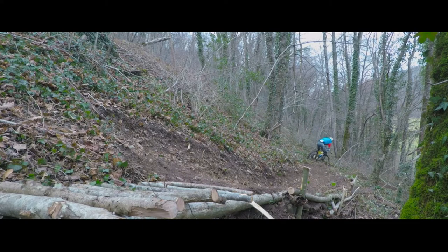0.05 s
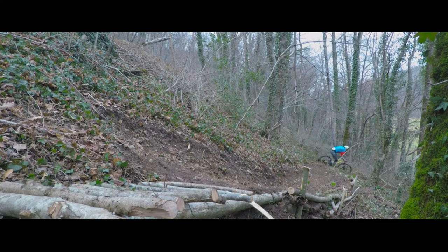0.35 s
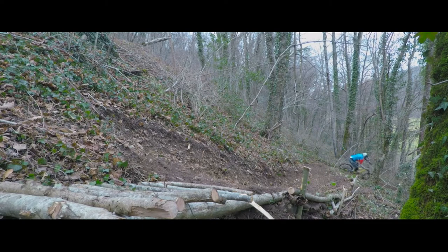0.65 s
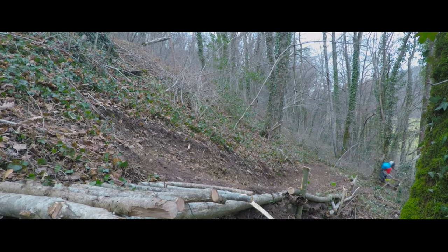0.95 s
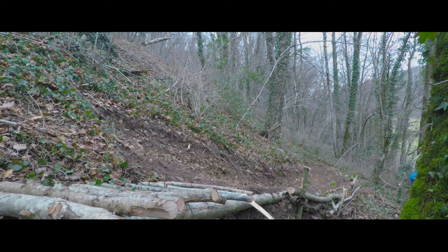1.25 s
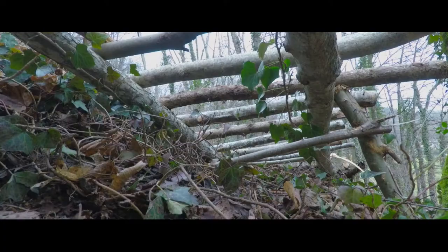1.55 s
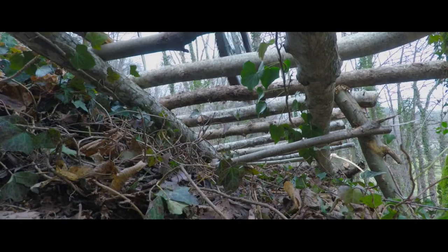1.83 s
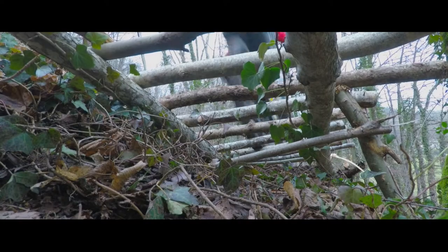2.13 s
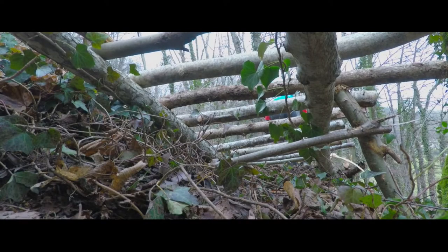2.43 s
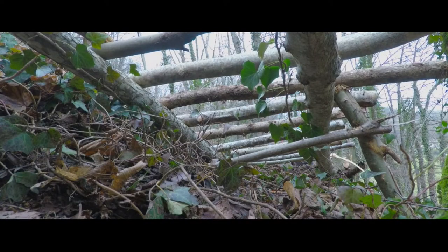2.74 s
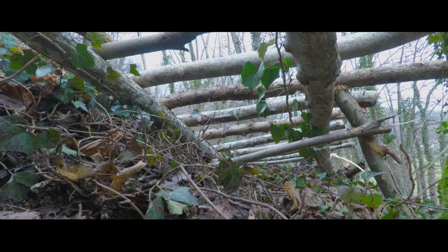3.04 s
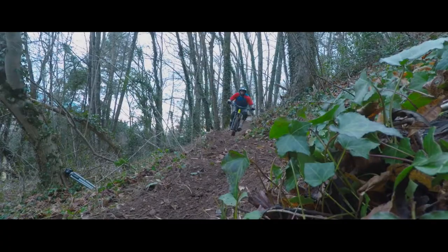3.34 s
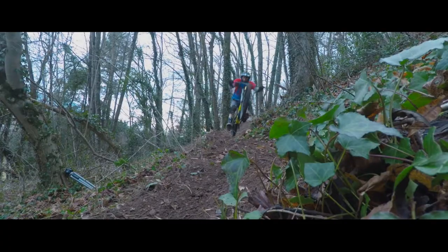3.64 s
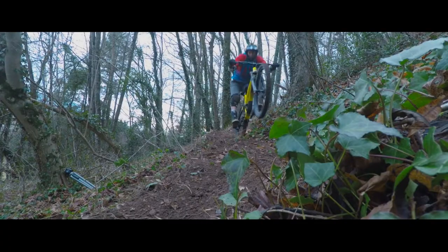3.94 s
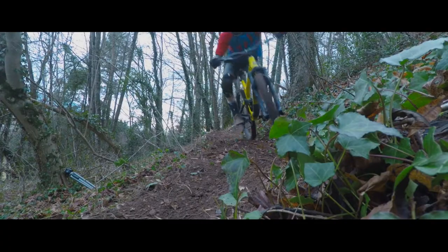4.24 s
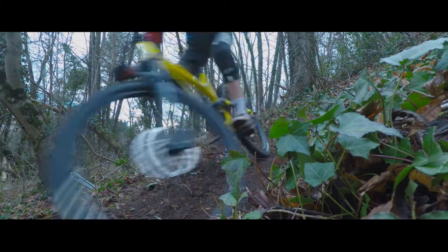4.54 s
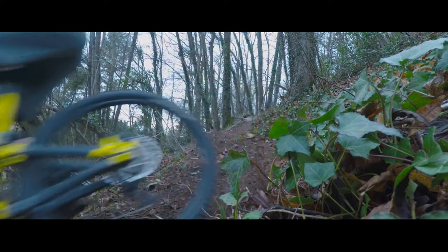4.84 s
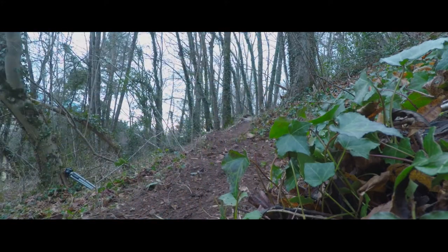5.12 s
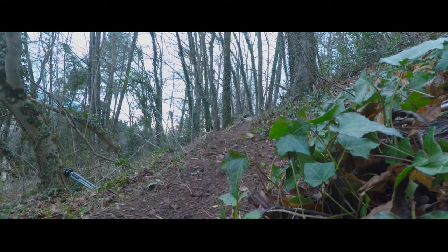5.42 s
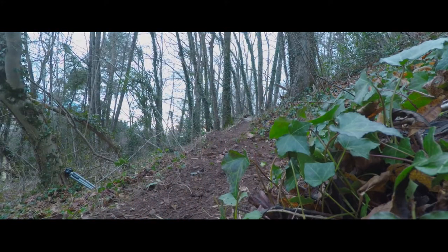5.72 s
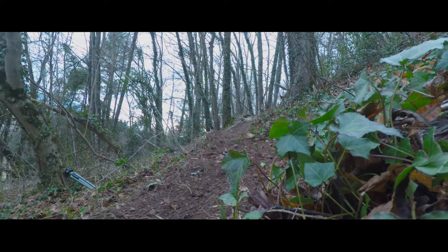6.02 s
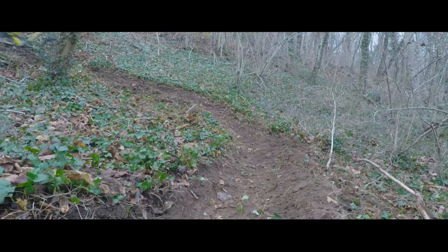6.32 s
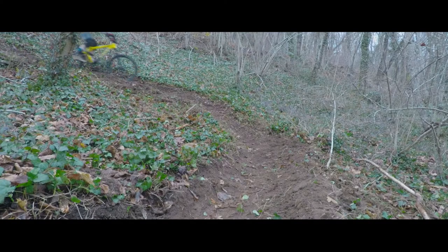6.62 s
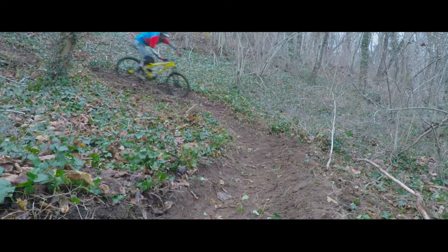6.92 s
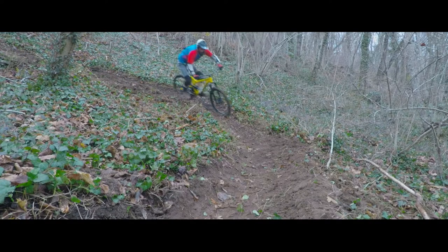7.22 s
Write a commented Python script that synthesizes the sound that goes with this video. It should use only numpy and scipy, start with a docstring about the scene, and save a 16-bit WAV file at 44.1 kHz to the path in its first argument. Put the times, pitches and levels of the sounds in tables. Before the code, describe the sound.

Mountain bikes pass four times on a forest dirt trail, heard from a microphone near the ground. The first crunches faintly over leaves and a stick snaps. The second knocks and rumbles over a log bridge just overhead, chain clicking. The third jumps past very close, thumping, knocking stones and coasting off with a ticking freewheel. The last approaches over crackling leaves. Gusts of air buffet the microphone.

```python
"""Mountain bikes on a forest dirt trail, from a small camera lying near the ground.
The first passes 5 m off, knobbly tyres booming and crunching over grit and dry leaves; a stick snaps.
The second sets a log bridge knocking and rumbling just overhead, its chain clicking. The third jumps
past at 1 m, thumps on roots, knocks stones and coasts away, freewheel ticking. The last comes down
to 2.5 m. Throughout, moving air buffets the microphone and the trees scatter a thin echo."""
import sys
import numpy as np
from scipy import signal
from scipy.fft import rfft, irfft
from scipy.io import wavfile
from scipy.ndimage import uniform_filter1d, map_coordinates

SR = 44100
rng = np.random.default_rng(int(sys.argv[2]) if len(sys.argv) > 2 else 0)


def generate_wav(signal):
    """Clip the signal to [-1, 1] and save it as 16-bit WAV at the path in sys.argv[1]."""
    frames = np.transpose(np.atleast_2d(signal))
    scaled = np.clip(frames, -1, 1) * 32767
    pcm = np.round(scaled).astype(np.int16)
    wavfile.write(sys.argv[1], SR, pcm)


N = 325017
T = np.arange(N) / SR
HIT_T = T[:8192]  # time within one blow

# one bike rides past between each two edges: edge_s
PASS_EDGES_S = [0, 1.51, 3.15, 6.18, 7.4]
# spectrum of grit ground under a tyre: frequency_hz, level_db
GRIT_SPECTRUM = [(60, -26), (150, -19), (350, 2.5), (520, 1), (750, 1), (1200, -5), (2000, -11),
                 (3000, -14.5), (6000, -19.5), (15000, -81)]
# spectrum of a dry click: frequency_hz, level_db
CLICK_SPECTRUM = [(60, -43), (200, 7), (800, 7.5), (4000, 1.5), (4900, -2.5), (6300, 1), (7200, -1.5),
                  (8400, -15.5), (15000, -23.5)]


def ride():
    """Each bike runs by in a straight line; its place sets tyre levels, side and scattered share."""
    # a row a bike; levels at its nearest to the microphone, pans positive to the left:
    # nearest_s, nearest_m, boom_db, grit_db, leaf_db, coming_pan_db, going_pan_db
    passes = [(0.28, 5, -51.5, -57, -57, -8, -2.5), (2.078, 0.79, -31, -41, -39.5, 10.5, 2.5),
              (4.758, 1, -26.5, -25, -38.5, 1, 9), (7.35, 2.47, -35.5, -36.5, -45, 5, 3)]
    speed_m_s, half_scattered_m = 5.49, 5.2
    current = np.searchsorted(PASS_EDGES_S, T, side="right") - 1
    nearest_s, nearest_m, boom_db, grit_db, leaf_db, coming_db, going_db = np.array(passes)[current].T
    along_m = speed_m_s * (T - nearest_s)
    distance_m = np.hypot(along_m, nearest_m)
    doublings = np.log2(distance_m / nearest_m)
    # with distance the soft ground soaks up the crunch of grit most
    levels = boom_db - 6 * doublings, grit_db - 11 * doublings, leaf_db - 6.5 * doublings
    pan_db = coming_db + (going_db - coming_db) * (1 + along_m / distance_m) / 2
    return levels, pan_db, distance_m / (distance_m + half_scattered_m)


def tyres(levels, pan_db, share):
    """Knobs drum the casing, grind grit and crush leaves; uneven ground jolts all three together."""
    # a tyre scuffs sideways: middle_s, half_length_s, more_grit_db, more_leaf_db
    scuffs = [(0.3, 0.081, 14, 4.5), (1.711, 0.055, 9, 13.5), (3.52, 0.2, 6.5, 5.5), (4.164, 0.064, -4, 9),
              (4.653, 0.029, 2, 1), (4.85, 0.09, -2.5, 3), (6.285, 0.047, 4, 9.5), (6.4, 0.084, -10, 5.5),
              (6.534, 0.035, 11, 4.5), (6.988, 0.024, 5, 3)]
    # the bike goes light or leaves the ground: middle_s, half_length_s, drop_db
    hops = [(1.662, 0.016, 7), (3.814, 0.09, 10), (4.065, 0.048, 4), (4.948, 0.017, 10), (5.849, 0.37, 0.5),
            (6.623, 0.33, 8.5)]
    # spectra of the casing, dry leaves and crumbs of dirt landing on them: frequency_hz, level_db
    casing_spectrum = [(60, -38), (100, -50.5), (130, -12.5), (160, 2.5), (190, 0.5), (250, -7),
                       (320, -11.5), (450, -16), (700, -25), (1500, -82.5)]
    leaf_spectrum = [(700, 2.5), (1800, -2), (2900, 2), (3900, 1.5), (4900, -4.5), (6200, -1), (7100, -1.5),
                     (8300, -12.5), (10000, -15), (12000, -36), (15000, -54)]
    spray_spectrum = [(1500, -2.5), (3500, 1), (6300, 15.5), (8300, -28), (11500, -8.5), (14500, -10),
                      (16000, -35)]
    boom_db, grit_db, leaf_db = levels
    for s, half_length_s, more_grit_db, more_leaf_db in scuffs:
        slip = np.exp(-((T - s) / half_length_s) ** 2)
        grit_db, leaf_db = grit_db + more_grit_db * slip, leaf_db + more_leaf_db * slip
    lift_db = sum(db * np.exp(-((T - s) / half_length_s) ** 2) for s, half_length_s, db in hops)
    boom_db, grit_db = boom_db - lift_db, grit_db - lift_db / 2
    jolt = np.tanh(walk(70)) * (1.3 - share)  # the suspension limits the jolts, distance smooths them
    boom = contact(casing_spectrum, boom_db + 1.5 + 3 * jolt,
                   rate=1200, spread_db=3, pan_db=0.14 * pan_db, share=0.27 * share ** 2)
    grit = contact(GRIT_SPECTRUM, grit_db - 6 + 4 * jolt,
                   rate=1500, spread_db=1.5, pan_db=pan_db, share=share ** 0.99)
    leaves = contact(leaf_spectrum, leaf_db + 0.5 + 2 * jolt + 2 * walk(200),
                     rate=6000, spread_db=2.5, pan_db=0.47 * pan_db, share=share ** 0.78)
    # flung crumbs tick brightly, and carry only from close to the microphone
    spray = contact(spray_spectrum, leaf_db - 4.5 - 6.5 * share + 4 * walk(120),
                    rate=290, spread_db=0, pan_db=0.11 * pan_db, share=0.9)
    return no_bass(boom + grit + leaves + spray, hz=114)


def thumps(small_bumps, pan_db, share):
    """The casing booms for a few cycles as the tyre squashes; earth thuds and grit is crushed."""
    # a tyre hits a root or log, or lands: start_s, boom_db, squash_s, earth_db, grit_db
    blows = [(0.186, -41, 0.0082, -41, -39), (0.272, -42, 0.017, -38, -42.5), (0.31, -34, 0.0064, -43, -48),
             (1.515, -21.5, 0.0044, -39, -44), (1.56, -20, 0.013, -29.5, -40), (1.692, -11, 0.01, -20, -32),
             (1.72, -8.5, 0.0062, -22, -56), (1.82, -1, 0.0073, -16, -22), (1.892, -12, 0.0046, -51, -55),
             (1.935, -10.5, 0.013, -44, -34), (1.974, -12, 0.011, -13, -23), (2.034, -11, 0.0077, -34, -44),
             (2.068, -1.5, 0.0038, -41, -45), (2.095, -3.5, 0.0072, -40, -50),
             (2.115, -11, 0.0076, -46, -51), (2.19, -10, 0.0062, -22.5, -34), (2.214, -12, 0.013, -29, -42),
             (2.239, -19, 0.009, -50, -51), (3.113, -23.5, 0.0078, -30.5, -47),
             (3.415, -27.5, 0.049, -32, -45), (3.952, -24.5, 0.013, -29.5, -62),
             (3.985, -23, 0.012, -29.5, -34.5), (4.117, -18.5, 0.0059, -22, -22.5),
             (4.165, -20, 0.0052, -24.5, -52), (4.32, -31, 0.0058, -49, -28),
             (4.365, -15.5, 0.012, -24, -28), (4.427, -10, 0.013, -28, -22),
             (4.521, -17.5, 0.017, -23, -24), (4.545, -13, 0.017, -17, -20.5),
             (4.571, -27, 0.011, -21, -22), (4.639, -16, 0.009, -20, -19.5), (4.66, -14, 0.016, -21, -27),
             (4.725, -22, 0.0033, -16, -33), (4.775, -22, 0.012, -15.5, -29),
             (4.805, -34, 0.0074, -18.5, -28), (4.954, -21, 0.0081, -10.5, -18),
             (4.965, -2, 0.0079, -12, -22), (5.045, -20, 0.03, -16.5, -24), (5.102, -2, 0.0028, -14, -44),
             (5.136, -18, 0.0033, -20, -34), (5.223, -14.5, 0.0053, -26, -41),
             (5.269, -14.5, 0.0022, -29.5, -40), (5.349, -21.5, 0.0076, -30.5, -53),
             (5.403, -17.5, 0.0096, -33, -55), (5.499, -37, 0.0087, -33, -42),
             (5.589, -21.5, 0.0023, -38, -55), (5.654, -27, 0.0041, -33, -39.5),
             (5.814, -37, 0.0034, -30, -62), (6.059, -29.5, 0.016, -33.5, -47),
             (6.27, -20, 0.0073, -51, -51), (6.511, -25, 0.01, -41.5, -49), (6.953, -31.5, 0.02, -44, -46),
             (7.11, -22.5, 0.011, -38.5, -29.5), (7.228, -16.5, 0.0069, -37, -42),
             (7.303, -18.5, 0.0098, -27, -35), (7.355, -14, 0.0056, -21.5, -26.5)]
    # spectrum of packed earth: frequency_hz, level_db
    earth_spectrum = [(100, -32.5), (200, -1), (310, 6), (450, -2), (580, -6.5), (900, -28), (2500, -53)]
    casing_hz = 186.7
    booms, crunch = np.zeros(N), np.zeros((3, N))  # crunch: one direct path, two scattered
    for s, boom_db, squash_s, earth_db, grit_db in list(blows) + small_bumps:
        hz = casing_hz * (1 + 0.062 * rng.standard_normal())
        squash = HIT_T / squash_s
        load = (squash * np.exp(1 - squash)) ** 1.8
        sag = 1 + 0.13 * np.exp(-squash)  # the pitch sinks as the load comes off
        add(booms, s, peak(load * np.sin(2 * np.pi * np.cumsum(hz * sag) / SR), boom_db - 4.5))
        crush = [grains(3500, 3.84, len(HIT_T)) * squash ** 0.31 * np.exp(-squash) for _ in crunch]
        add(booms, s, peak(colour(crush[0], earth_spectrum), earth_db + 2))
        add(crunch, s, np.array([peak(colour(path, GRIT_SPECTRUM), grit_db + 6.5) for path in crush]))
    grit = place(crunch[0], crunch[1:], pan_db, 0.92 * share)
    return no_bass(booms, hz=119) * pan(0.26 * pan_db) + no_bass(grit, hz=135)


def bumps(boom_db, grit_db, count):
    """Small stones and roots at random places give blows for thumps(), as strong as the rolling."""
    squash_s, spread_db = 0.011, 7
    when, size = rng.random((count, 2)).T
    times = (np.arange(count) + when) * T[-1] / count
    size_db = 2 + spread_db * (2 * size - 1)
    thump_db = np.interp(times, T, boom_db) + size_db
    crush_db = np.interp(times, T, grit_db) + size_db
    return [(s, db, squash_s, db - 5, crush) for s, db, crush in zip(times, thump_db, crush_db)]


def logs():
    """Loose bridge logs knock, each with its own pitch and damping; full weight gives a dull knock."""
    # knocks under the wheels: start_s, level_db, tilt_db_per_octave, pitch_hz, t60_s
    knocks = [(1.695, -23, -20, 456, 0.054), (1.722, -29, -22, 480, .04), (1.822, -18.5, -2.5, 520, 0.023),
              (1.943, -22.5, 0, 587, .03), (1.978, -15.5, -7.5, 661, 0.052), (2.038, -20.5, 5, 657, 0.028),
              (2.065, -21, 8, 638, 0.032), (2.104, -22.5, -5, 650, .05), (2.156, -27, -3, 710, .035),
              (2.176, -23.5, 0, 642, 0.044), (2.212, -23, 0.5, 638, .045), (2.307, -29, -2, 716, 0.016),
              (2.354, -25.5, -4.5, 607, 0.027), (2.645, -27, -15.5, 491, 0.026),
              (2.775, -37, -10, 672, .07), (2.912, -27.5, -13.5, 590, 0.02), (2.932, -36, -9.5, 690, .025),
              (3.013, -31, -15, 602, 0.05), (3.03, -34.5, -13, 647, 0.08), (3.098, -30.5, -14, 596, 0.035),
              (3.107, -32, -7.5, 718, .025), (3.117, -27.5, -13, 565, 0.032)]
    # modes of a log: pitch_ratio, level_db, t60_ratio
    modes = [(.69, -3, 0.48), (1, 4.5, 1.13), (1.25, 1, .45), (1.46, -6, 1.1), (2.19, 2.5, 1.2),
             (2.42, 2, 1.03), (2.83, -10, .5), (3.39, 2, 1.3), (3.87, -4, 0.54), (5.17, -1, 1)]
    out = np.zeros(N)
    for s, db, tilt_db, hz, t60 in knocks:
        ring = np.zeros(len(HIT_T))
        for ratio, mode_db, t60_ratio in modes:
            # each log is struck at its own spot, so its modes vary in strength
            gain = undb(mode_db + tilt_db * np.log2(ratio) + 3 * rng.standard_normal())
            mode_hz = hz * ratio * (1 + 0.019 * rng.standard_normal())
            ring += gain * fade(t60 * t60_ratio) * np.sin(2 * np.pi * (mode_hz * HIT_T + rng.random()))
        crack = clack(hz=795, t60=0.061, q=0.57, splinter=0.49)
        add(out, s, peak(ring * swell(0.0007), db) + peak(crack, db - 6.5 + tilt_db / 2))
    return out


def deck():
    """Tyre knobs drum on the logs and keep the hollow bridge ringing above the microphone."""
    # the rumble while the wheels are on the bridge: time_s, level_db
    rumble = [(1.68, -42), (1.77, -32), (1.87, -28), (2.0, -27.5), (2.12, -22), (2.23, -23), (2.3, -32.5),
              (2.42, -48)]
    # resonances of the bridge: pitch_hz, q, level_db
    modes = [(193, 7.2, 0), (146, 5.3, -6.5), (368, 5.9, -22.5), (665, 5.5, -30)]
    drumming = grains(1500, 1.3)
    ring = sum(undb(db) * unit(resonate(resonate(drumming, hz, q), hz, q)) for hz, q, db in modes)
    return unit(ring) * undb(level_curve(rumble))


def stones(grit_db, pebble_count):
    """Stones and pebbles scrape briefly and ring; the pebbles follow the level of the rolling crunch."""
    # stones knock together under a tyre: start_s, peak_db, pitch_hz
    knocks = [(0.286, -34, 714), (4.282, -29, 740), (4.318, -27, 890), (4.368, -31, 1030),
              (4.47, -26.5, 620), (4.557, -19, 470), (4.608, -17.5, 830), (4.644, -12, 786),
              (4.661, -14, 750), (4.673, -18, 898), (4.731, -20, 1030), (4.779, -19.5, 770),
              (4.792, -23, 1110), (4.812, -23, 675), (4.966, -27, 720), (5.067, -31, 1010),
              (5.08, -17, 814)]
    # modes of a stone bedded in earth: pitch_ratio, level_db, t60_s
    modes = [(1, 7, 0.025), (1.45, -1, 0.026), (2.2, -12, 0.018)]
    when, size, pitch = rng.random((pebble_count, 3)).T
    pebble_s = when * T[-1]
    pebble_db = np.interp(pebble_s, T, grit_db) - 3.5 + 7.5 * (2 * size - 1)
    pebble_hz = 1000 * 2 ** (0.91 * (2 * pitch - 1))
    decays = [(ratio, undb(db) * fade(t60)) for ratio, db, t60 in modes]
    out = np.zeros(N)
    for s, db, hz in list(knocks) + list(zip(pebble_s, pebble_db, pebble_hz)):
        ring = sum(decay * np.sin(2 * np.pi * ratio * hz * HIT_T) for ratio, decay in decays)
        add(out, s, peak(signal.fftconvolve(burst(t60=0.0085), ring), db))
    return out


def stone_strikes():
    """The tyre bottoms on a hard stone and gives one blunt shove."""
    # single pulses: start_s, peak_db, contact_s
    strikes = [(4.538, -13.5, 0.00028), (4.558, -14, 0.00059), (4.661, -17, 0.00033), (4.732, -14, .0003),
               (4.78, -16, 0.00039), (4.966, -7.5, .0003), (4.972, -7, 0.00019), (5.05, -14.5, 0.00043),
               (5.103, -9.5, 0.00063)]
    out = np.zeros(N)
    for s, db, contact_s in strikes:
        age = HIT_T / contact_s
        add(out, s, -peak(no_bass(age ** 2 * np.exp(-2 * age), hz=240), db))
    return out


def crunches():
    """Dry stalks and grit give way: crackles start at once, last while the tyre presses and stop."""
    # bursts of crackles: start_s, peak_db, length_s, centre_hz
    bursts = [(4.642, -18.5, .016, 1510), (4.672, -22, .006, 1200), (4.705, -23, .006, 1300),
              (4.729, -21.5, 0.0097, 1200), (5.063, -20.5, .016, 1300), (6.319, -32.5, 0.011, 3820),
              (6.507, -42, .012, 3020), (6.527, -39, 0.013, 3200), (6.847, -31, .016, 2200),
              (6.894, -28.5, 0.015, 4000), (7.01, -29, 0.013, 2400), (7.097, -24.5, 0.026, 2670),
              (7.15, -29.5, 0.018, 3200)]
    out = np.zeros(N)
    for s, db, length_s, hz in bursts:
        press = np.exp(-(HIT_T / length_s) ** 4)
        crackles = grains(rate=3000, spread_db=3, size=len(HIT_T)) + signal.unit_impulse(len(HIT_T))
        add(out, s, peak(colour(resonate(crackles * press, hz, q=1.2), CLICK_SPECTRUM), db))
    return out


def clack(hz, t60, q, splinter):
    """A crack builds up within a millisecond and splinters, ringing briefly round one pitch."""
    age_ms = HIT_T / 0.001
    force = age_ms * np.exp(1 - age_ms) + 2 * splinter * (1 - np.exp(-age_ms / 2)) * fade(t60)
    return colour(resonate(force * rng.standard_normal(len(HIT_T)), hz, q), CLICK_SPECTRUM)


def rattles():
    """Twigs, stones and chain clack sharply."""
    # single clacks: start_s, level_db, centre_hz, t60_s
    clacks = [(1.526, -15, 5230, 0.037), (1.819, -22.5, 1120, 0.067), (2.066, -16.5, 1930, 0.061),
              (2.104, -21, 2190, 0.023), (2.39, -24, 2800, 0.017), (2.544, -25.5, 5460, 0.017),
              (2.728, -27, 6600, 0.042), (3.557, -27, 5290, 0.0091), (4.118, -35, 1190, 0.039),
              (4.124, -24, 5160, 0.048), (4.537, -16, 926, 0.025), (4.587, -22.5, 2480, 0.014),
              (4.804, -20, 5860, 0.016), (4.849, -27, 4200, 0.029), (4.872, -18.5, 4000, 0.028),
              (4.92, -24, 4940, 0.03), (5.037, -19, 882, 0.023), (5.202, -35, 5000, 0.033),
              (5.264, -33, 7150, 0.05), (5.479, -31.5, 1880, 0.069), (5.494, -36, 5530, 0.015),
              (6.893, -29, 1150, 0.055), (6.997, -29.5, 3200, 0.025), (7.233, -22.5, 5100, 0.052),
              (7.333, -23, 2320, 0.044), (7.358, -22, 1200, 0.033)]
    out = np.zeros(N)
    for s, db, hz, t60 in clacks:
        add(out, s, peak(clack(hz, t60, q=2.2, splinter=0.3), db + 0.5))
    return out


def freewheel():
    """While the rider coasts, each pawl ticks and leaves a steel sizzle."""
    # spells of coasting: start_s, end_s, ticks_per_s, tick_db, sizzle_db
    coasting = [(1.518, 1.53, 26.3, -27, -33), (1.607, 1.73, 26.2, -33, -39.5),
                (1.761, 1.93, 27, -24.5, -35), (2.026, 2.26, 26, -38, -46), (3.782, 4.097, 41, -40.5, -55),
                (4.697, 4.94, 48.5, -30, -38), (5.205, 6.15, 45, -46, -50)]
    # spectrum of the sizzle: frequency_hz, level_db
    sizzle_spectrum = [(4000, -13), (6500, 0), (11500, -18), (14500, -13), (16000, -36)]
    out = np.zeros(N)
    for start, end, rate, tick_db, sizzle_db in coasting:
        for s in np.arange(start, end, 1 / rate):
            pawl = clack(hz=3100, t60=0.05, q=2.9, splinter=0.45)
            pawl += clack(hz=6300, t60=0.035, q=1.3, splinter=0.8)
            add(out, s, peak(pawl, tick_db + rng.standard_normal()))
            add(out, s, peak(colour(burst(t60=0.079), sizzle_spectrum), sizzle_db))
    return out


def chain():
    """Chain links and cables flick against the frame: bright ticks of steel that die at once."""
    # single flicks: start_s, peak_db
    flicks = [(1.645, -35), (1.801, -24), (1.838, -29), (1.846, -24), (1.9572, -26), (1.99, -26),
              (2.0284, -31), (2.076, -23), (2.112, -28), (2.1466, -33), (2.2094, -28), (2.2485, -30),
              (2.391, -26), (2.4644, -30.5), (2.5116, -28), (2.737, -38), (5.038, -28.5)]
    # ring of a chain link: frequency_hz, level_db
    link_spectrum = [(1500, -13), (3200, 2.5), (4800, -4.5), (6400, 4), (7600, -3.5), (8600, -12),
                     (11500, -17), (15000, -20)]
    out = np.zeros(N)
    for s, db in flicks:
        add(out, s, peak(colour(burst(t60=0.026), link_spectrum), db))
    return out


def brake_disc():
    """A brake disc pings once, on a single mode."""
    start_s, pitch_hz = 4.462, 2780
    out = np.zeros(N)
    ring = np.sin(2 * np.pi * pitch_hz * HIT_T) * swell(0.002) * fade(t60=0.052)
    add(out, start_s, peak(ring, db=-27.5))
    return out


def stick():
    """A dry stick far down the trail breaks in two quick steps and rings briefly."""
    # steps of the break: start_s, peak_db
    snaps = [(0.5176, -19), (0.521, -29)]
    # modes of the stick: pitch_hz, level_db, t60_s
    modes = [(1900, -3, .014), (2270, 0, .012), (2650, 0, .008), (3200, 0, .005), (5700, -7, .005)]
    out = np.zeros(N)
    ring = sum(undb(db) * fade(t60) * np.sin(2 * np.pi * hz * HIT_T) for hz, db, t60 in modes)
    for s, db in snaps:
        add(out, s, peak(ring * swell(0.00045), db))
    return out


def whirr(pan_db, share):
    """Far down the trail the ticks of the freewheel smear into a whirr at the pitch of the hub."""
    # the whirr as the bike rolls away: time_s, level_db
    receding = [(5.1, -48), (5.5, -53), (6.15, -59)]
    # ring of the rear hub: frequency_hz, level_db
    hub_spectrum = [(1500, -15), (2400, -5), (2800, 0.5), (3200, -19), (3800, -27), (4300, -5.5),
                    (5000, -32), (5900, -48), (7000, -3.5), (9000, -29)]
    return contact(hub_spectrum, level_curve(receding), rate=740, spread_db=3, pan_db=pan_db, share=share)


def trees(x, t60, db):
    """Trunks and the bank throw back a thin echo, different at each microphone port."""
    # frequency_hz, level_db
    echo_spectrum = [(150, -9.5), (700, 0.5), (2500, 2.0), (6500, -2.0), (12000, 9.5)]
    decay = np.exp(-np.log(1000) * T[:SR // 2] / t60)
    tails = [colour(grains(4000, 2, len(decay)) * decay, echo_spectrum) for _ in range(2)]
    return np.array([signal.oaconvolve(x, tail / np.linalg.norm(tail))[:N] for tail in tails]) * undb(db)


def wind():
    """Eddies, strongest in the wake of a bike, buffet the two microphone ports."""
    # gusts swell, then die away until the pass ends: start_s, rise_s, level_db, fall_db_per_s
    gusts = [(0, 0.29, -38, 25.5), (0.7, 0.38, -51, 3), (1.97, 0.23, -21.5, 55), (2.5, 0.27, -36, 14),
             (4.72, 0.34, -29, 28.5), (5.55, 0.2, -52, 9)]
    # spectrum of the buffeting: frequency_hz, level_db
    air_spectrum = [(15, -25), (27, -1.5), (38, -3.5), (55, -1), (95, -7), (140, -9.5), (300, -29),
                    (900, -61.5)]
    swell_db, onset_db_per_s = 12, 170
    gain = np.zeros(N)
    for start, rise_s, db, fall_db_per_s in gusts:
        end = min(s for s in PASS_EDGES_S if s > start + rise_s)
        age = T - start
        stir_db = onset_db_per_s * np.minimum(age, 0)  # the air stirs just ahead of a gust
        rise_db = -swell_db * np.maximum(1 - age / rise_s, 0)
        fall_db = -fall_db_per_s * np.maximum(age - rise_s, 0)
        gain += undb(db + stir_db + rise_db + fall_db) * (T < end)
    direct, *scattered = (colour(rng.standard_normal(N), air_spectrum) for _ in range(3))
    eddies = place(direct, scattered, pan_db=3, share=0.47)
    return eddies * uniform_filter1d(gain, size=900) * undb(1 + 2.2 * walk(14))


def background():
    """The faint hush of the woods, alike at both ports, under the microphone's own hiss, opposite at the two
    ports."""
    # spectra of the hush, alike at the two ports, and of the hiss, opposite at them: frequency_hz, level_db
    mid_spectrum = [(30, -14), (90, -5), (165, 17), (300, 6), (600, 4), (1500, 3), (2700, -4.5),
                    (4800, -15), (6300, -7.5), (8300, -9.5), (10000, -8), (12000, -15.5), (15000, -23)]
    side_spectrum = [(30, -24), (90, -13), (165, 22.5), (300, 17), (600, 14.5), (1000, 14.5), (1500, 7),
                     (2700, -5), (4800, -54), (6300, 0), (8300, -1.5), (10000, -5), (12000, -13),
                     (15000, -25)]
    mid = colour(rng.standard_normal(N), mid_spectrum) * undb(-56.5)
    side = colour(rng.standard_normal(N), side_spectrum) * undb(-50)
    return np.array([mid + side, mid - side]) * undb(0.5 * walk(4.57))


def contact(spectrum, db, rate, spread_db, pan_db, share):
    """A stream of tiny impacts at a given level, ringing one material."""
    direct, *scattered = (colour(unit(grains(rate, spread_db)) * undb(db), spectrum) for _ in range(3))
    return place(direct, scattered, pan_db, share)


def grains(rate, spread_db, size=N):
    """Random tiny impacts of uneven strength, about `rate` a second."""
    happens = rng.random(size) < rate / SR
    strength = undb(spread_db * np.minimum(rng.exponential(size=size), 4))
    return happens * strength * rng.choice([-1, 1], size)


def place(direct, scattered, pan_db, share):
    """The straight path is common to both ports; the scattered share differs between them."""
    share = np.clip(share, 0, 1)
    return (np.sqrt(1 - share) * direct + np.sqrt(share) * np.array(scattered)) * pan(pan_db)


def ports(x, pan_db):
    """Sound from far left reaches the right port later."""
    full_lag_s, full_left_db = 0.00037, 10
    lag_s = full_lag_s * np.clip(pan_db / full_left_db, 0, 1) ** 4
    return np.array([x[0], map_coordinates(x[1], [(T - lag_s) * SR], mode="nearest")])


def pan(db):
    """Left and right gains for a level difference, left minus right."""
    return undb(np.array([[1], [-1]]) * db / 2)


def colour(x, spectrum):
    """Causal filter of unit energy from frequency_hz, level_db points, made through the cepstrum."""
    size = 4096
    hz, db = np.transpose(spectrum)
    bin_db = np.interp(np.log(np.fft.rfftfreq(size, 1 / SR) + 1), np.log(hz), db)
    cepstrum = irfft(np.log(undb(bin_db)))[:size // 2]
    cepstrum[0] /= 2
    response = irfft(np.exp(rfft(2 * cepstrum, size)))
    return signal.oaconvolve(x, response / np.linalg.norm(response))[:len(x)]


def resonate(x, hz, q):
    """One broad resonance."""
    return signal.lfilter(*signal.iirpeak(hz, max(q, 0.6), fs=SR), x)


def no_bass(x, hz, order=4):
    """Small things radiate no deep bass."""
    return signal.sosfilt(signal.butter(order, hz, "high", fs=SR, output="sos"), x)


def swell(contact_s):
    """A ring builds up over the short time of the contact."""
    return 1 - np.exp(-(HIT_T / contact_s) ** 2)


def fade(t60):
    """Decay of a struck thing, 60 dB in t60 seconds."""
    return np.exp(-np.log(1000) * HIT_T / t60)


def burst(t60):
    """Noise that starts at once and dies away."""
    return rng.standard_normal(len(HIT_T)) * fade(t60)


def walk(rate):
    """Random levels held 1 / rate s and slewed; spread near 1."""
    hold = int(SR / rate)
    steps = np.repeat(rng.standard_normal(N // hold + 1), hold)
    return np.sqrt(3 / 2) * uniform_filter1d(steps, hold)[:N]


def level_curve(points):
    """A level in dB through time_s, level_db points, silent outside them."""
    return np.interp(T, *np.transpose(points), left=-120, right=-120)


def add(track, s, x):
    """Mix a short sound in at a time."""
    i = int(np.clip(s * SR, 0, N - 1))
    track[..., i:i + x.shape[-1]] += x[..., :N - i]


def peak(x, db):
    """Scale to a peak level."""
    return x * undb(db) / np.abs(x).max()


def unit(x):
    """Scale to rms 1."""
    return x / np.sqrt(np.mean(x ** 2))


def undb(db):
    """Decibels to gain."""
    return 10 ** (np.asarray(db) / 20)


def scene():
    """Rolling noise and blows follow each bike past the microphone, over wind, woods and the microphone's hiss."""
    levels, pan_db, share = ride()
    boom_db, grit_db, _ = levels
    small_bumps = bumps(boom_db, grit_db, count=34)
    sharp = rattles() + freewheel() + brake_disc() + chain() + stick() + crunches()
    sharp += stone_strikes() + logs() + stones(grit_db, pebble_count=200)
    dull = thumps(small_bumps, pan_db, share)
    echo = trees((sharp + 0.72 * dull.mean(axis=0)) * np.sqrt(share), t60=0.35, db=6)
    rolling = ports(tyres(levels, pan_db, share) + whirr(pan_db, share), pan_db)
    bikes = rolling + sharp * pan(0.39 * pan_db) + dull + echo + deck() * pan(0.16 * pan_db)
    return no_bass(bikes, hz=70, order=2) + wind() + background()


def record(dry):
    """The camera rounds the very loudest peaks and cuts the top."""
    ceiling, top_hz = 0.92, 15300
    rounded = dry / (1 + (dry / ceiling) ** 6) ** (1 / 6)
    return signal.sosfilt(signal.ellip(8, 0.2, 70, top_hz, fs=SR, output="sos"), rounded)


dry = scene()
out = record(dry)
generate_wav(out)
```